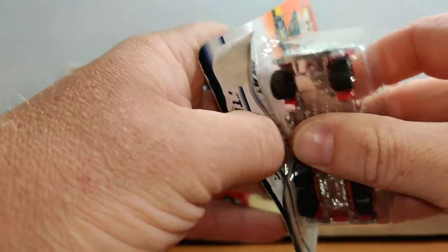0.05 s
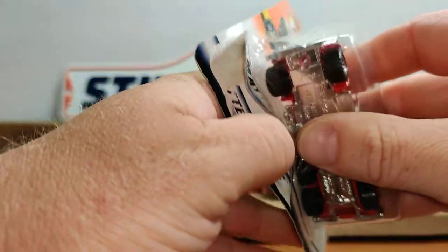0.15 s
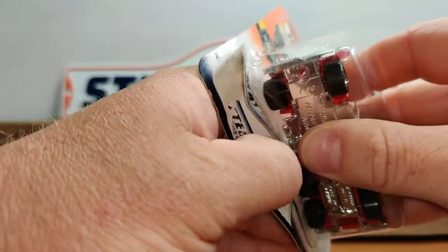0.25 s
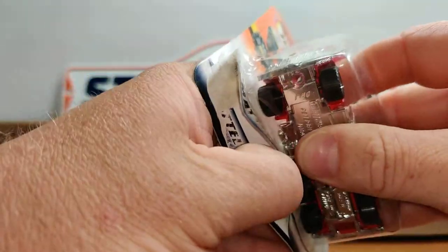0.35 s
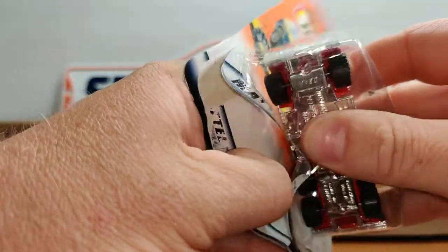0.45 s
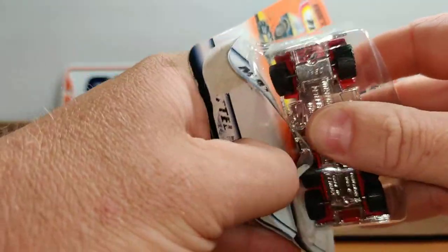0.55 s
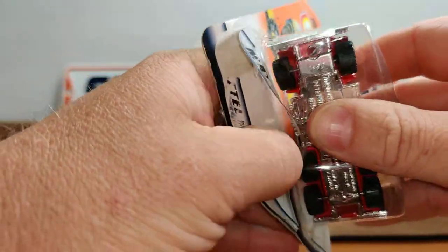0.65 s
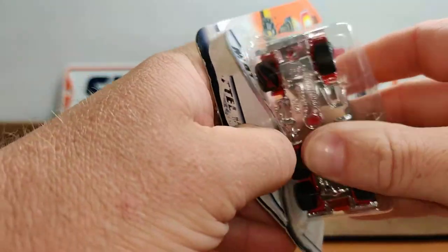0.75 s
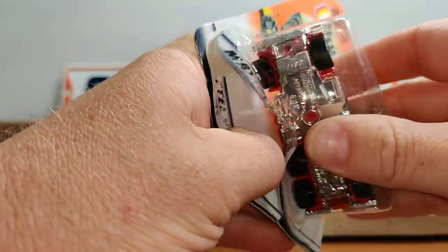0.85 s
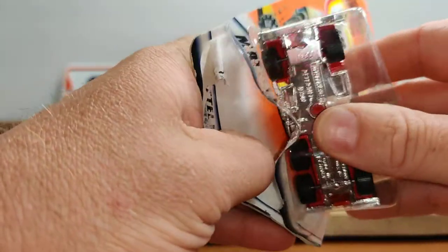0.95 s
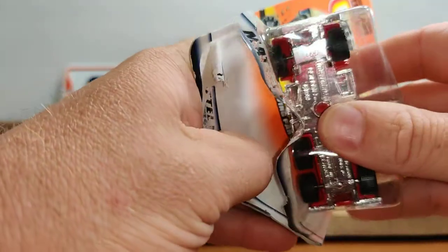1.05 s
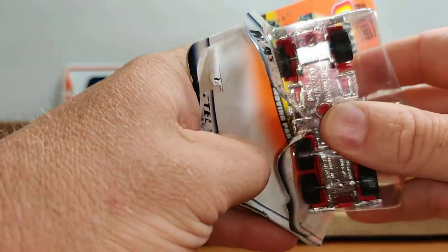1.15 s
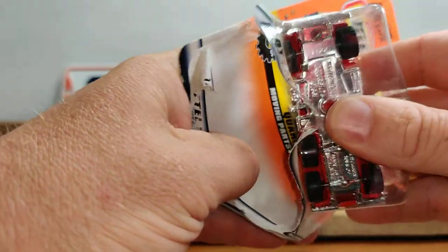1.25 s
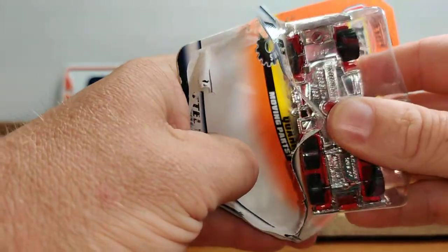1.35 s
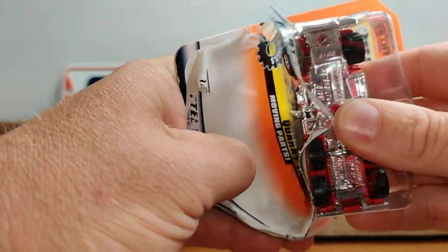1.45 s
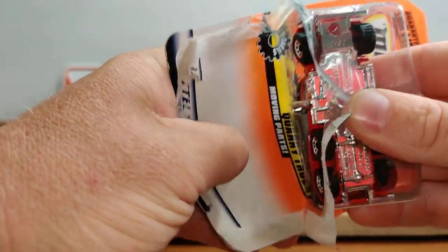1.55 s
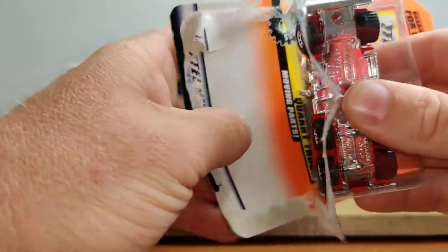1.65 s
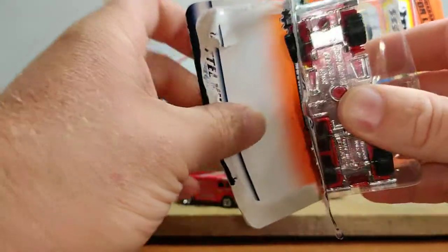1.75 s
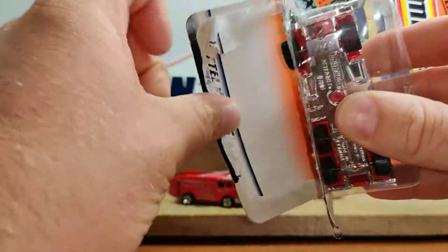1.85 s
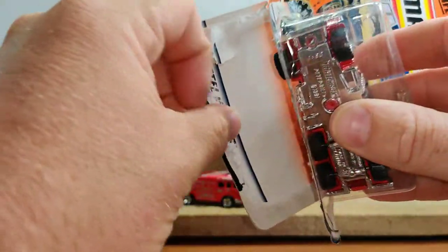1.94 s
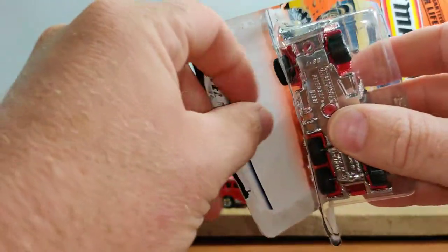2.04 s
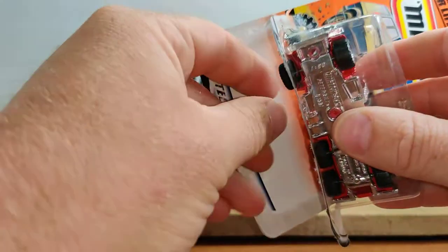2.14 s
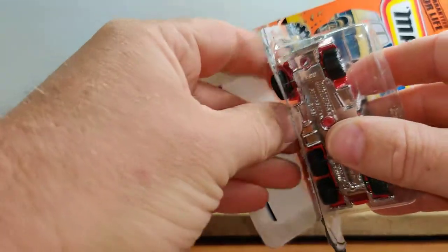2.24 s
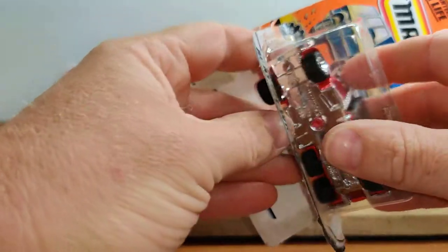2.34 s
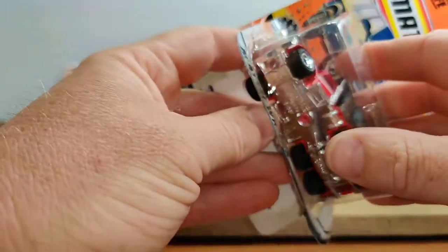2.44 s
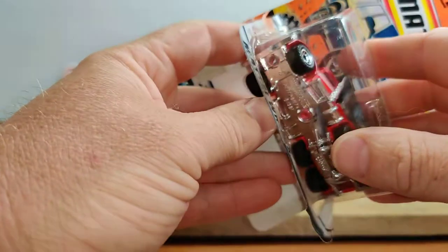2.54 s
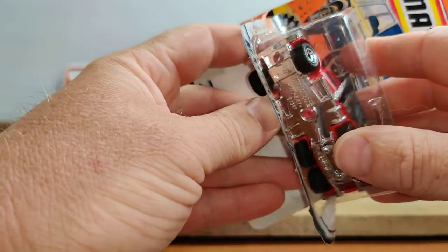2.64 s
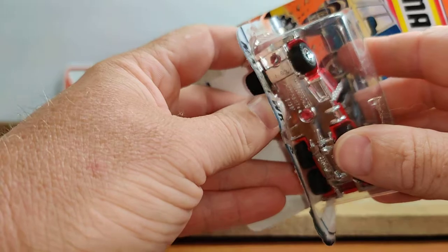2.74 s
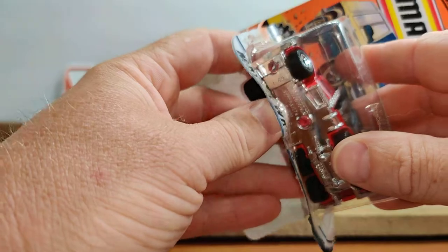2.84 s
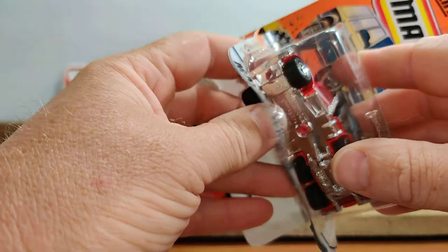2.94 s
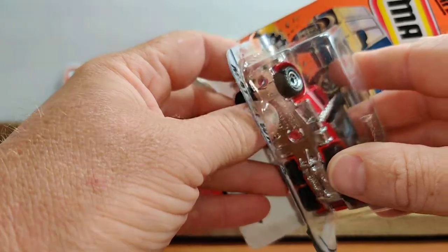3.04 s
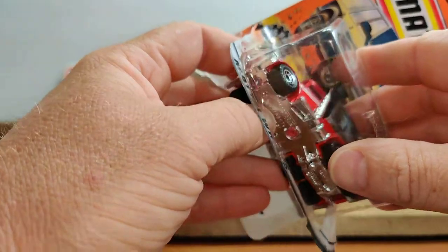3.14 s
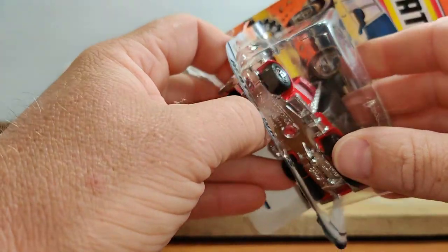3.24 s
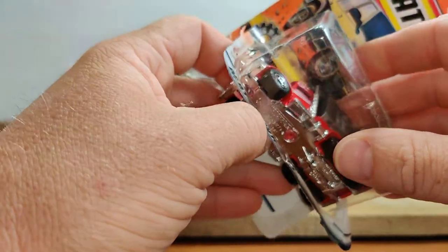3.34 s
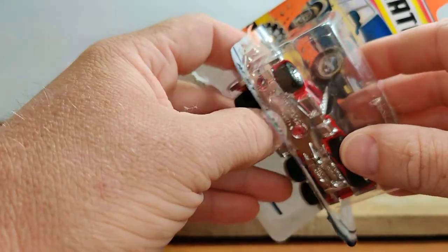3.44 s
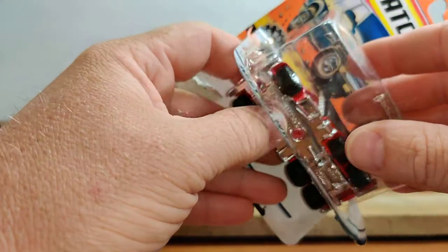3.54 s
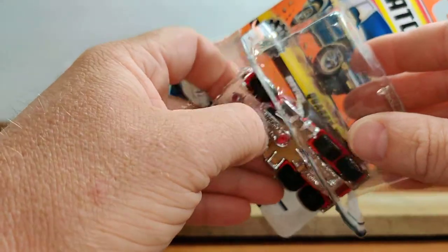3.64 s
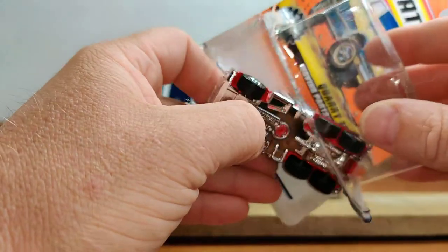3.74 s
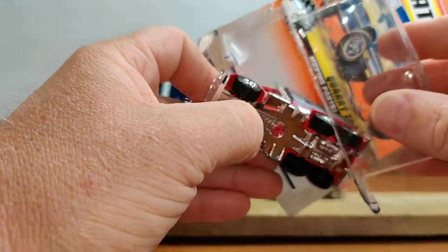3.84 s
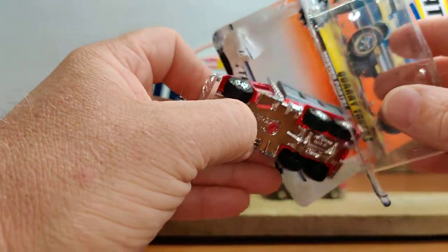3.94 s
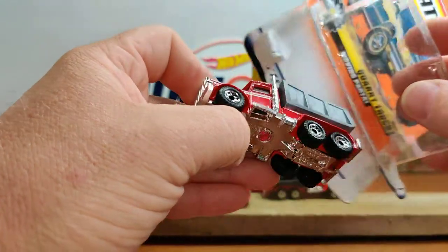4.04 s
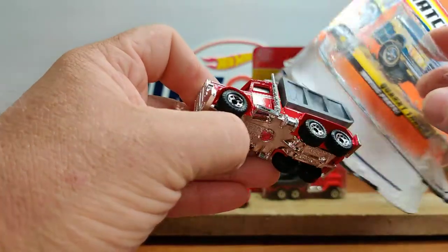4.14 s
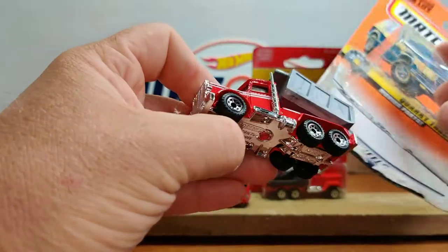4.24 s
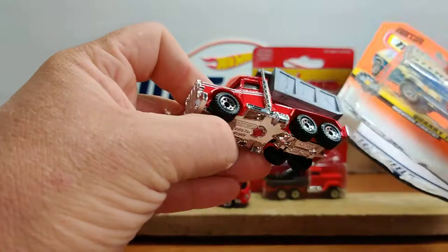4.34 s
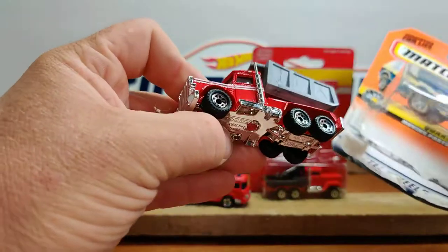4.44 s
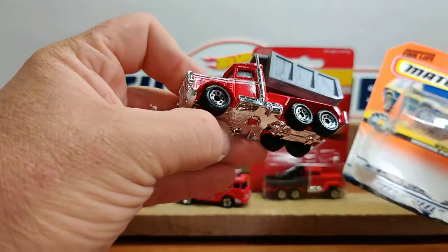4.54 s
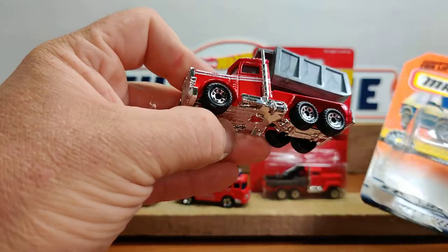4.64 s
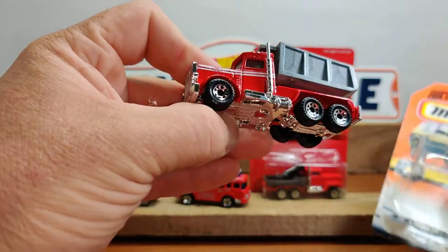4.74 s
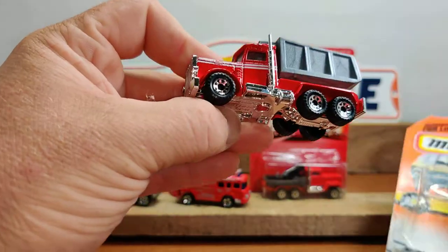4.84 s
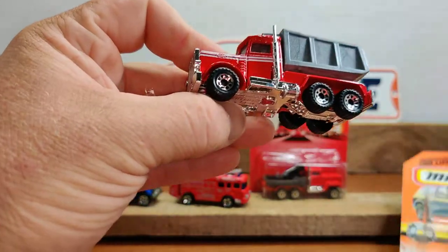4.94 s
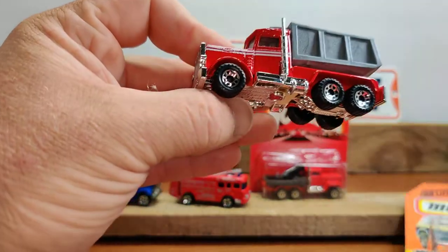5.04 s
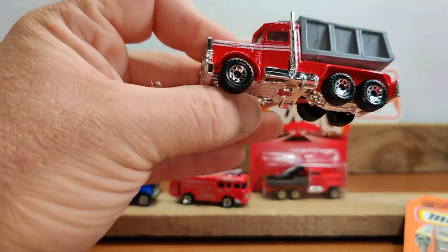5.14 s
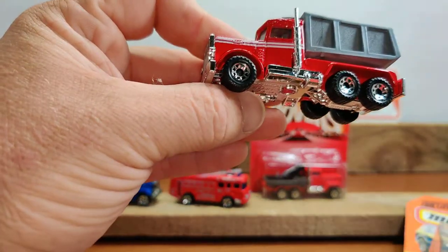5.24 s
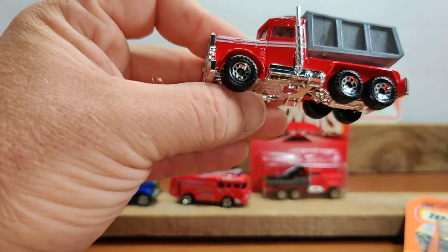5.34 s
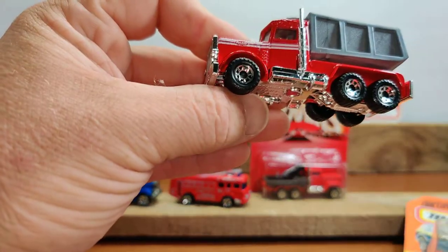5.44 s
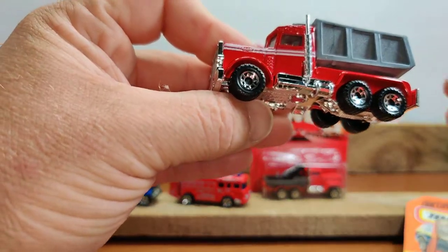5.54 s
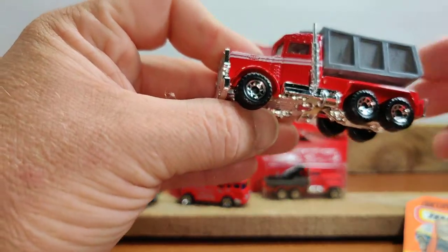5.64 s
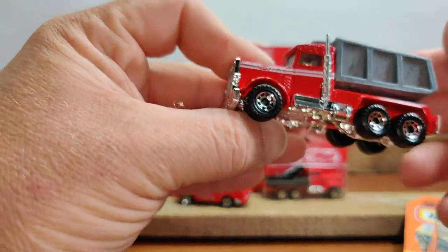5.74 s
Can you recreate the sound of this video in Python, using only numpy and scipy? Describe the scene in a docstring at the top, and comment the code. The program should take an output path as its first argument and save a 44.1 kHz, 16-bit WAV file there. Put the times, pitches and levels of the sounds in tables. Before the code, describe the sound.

Stiff plastic blister packaging snaps and crackles close up as it is peeled from card, then the empty pack drops on a table.

```python
"""Peeling a blister pack

Two hands peel a stiff plastic blister from its card close to a two-port microphone in a quiet room.
The shell buckles in sharp snaps (ringing modes) over a crackle of tearing glue and paper (many tiny
slips); a toy is pulled out, and the empty pack is dropped on the table to the right.
Hollow booms of the air pocket, hand rumble and thumps, and a faint hum with air noise lie around them."""
import sys
import numpy as np
from scipy import signal
from scipy.fft import rfft, irfft
from scipy.io import wavfile
from scipy.ndimage import uniform_filter1d

SR = 44100
rng = np.random.default_rng(int(sys.argv[2]) if len(sys.argv) > 2 else 0)


def boost_factor(decibels):
    """Convert a level in decibels to a linear amplitude factor."""
    exponent = np.asarray(decibels, float) / 20
    return 10 ** exponent


def int16_out(signal):
    """Quantize to a 16-bit WAV file."""
    q = np.round(np.clip(np.atleast_2d(signal).T, -1, 1) * 32767)
    wavfile.write(sys.argv[1], SR, q.astype(np.int16))


N = 255250  # length in samples

# Room tone, shape of its spectrum only: f/Hz, level/dB
AIR_SPECTRUM = [(15, -33), (25, -3), (64, 1), (92, -20.5), (161, -7), (405, -17.5), (887, -28), (4140, -45),
                (4870, -39), (6380, -48.5), (13600, -23.5), (16000, -45)]
AIR_DB = -64.5  # rms of the air noise before the microphone
# Room tone, how alike left and right are: f/Hz, likeness (0 to 1)
AIR_LIKENESS = [(300, 0.73), (1000, 0.39), (4000, .3), (12000, 0.18)]
# Steady hum before the microphone: f/Hz, level/dB (rms)
HUM_TONES = [(59, -76), (119, -69), (153, -67)]
# Thumps of the hands through table and stand, each starting 0.02 s before t: t/s, level/dB
HAND_THUMPS = [(0.515, -28), (0.682, -47), (1.3, -40), (1.572, -36.5), (1.69, -37.5), (3.06, -38),
               (3.251, -37.5), (4.025, -37)]

# Fingers resting and shifting on the pack between pulls: t/s, crackle level/dB
GRIP_LEVELS = [(0, -56.5), (.4, -61), (.85, -57), (1.4, -57.5), (1.9, -63), (2.2, -60.5), (2.45, -62.5),
               (2.9, -73), (3.15, -60), (3.36, -78.5), (3.9, -65), (4.4, -81), (5.2, -86.5), (5.5, -64.5),
               (5.79, -79)]
GRIP_BODY_DB, GRIP_FIZZ_DB = 3.5, 1.5  # relative to its crackle
# Separate pulls, rubs and slides: middle t/s, length t/s, crackle level/dB,
# card body level/dB, paper fizz level/dB (body and fizz relative to the crackle)
PACK_PULLS = [(0.106, 0.19, -44, -3, -2), (0.284, 0.13, -53, -4.5, 2), (0.487, 0.081, -41.5, -26, 1.5),
              (0.702, 0.18, -55, 6, -20.5), (0.95, 0.059, -33.5, 0.5, 1.5),
              (1.077, 0.63, -53.5, -18.5, -1.5), (1.29, 0.11, -35.5, -14, 1.5),
              (1.552, 0.19, -40, -26, 2.5), (1.713, 0.37, -48, -8.5, -7.5), (2.3, 0.082, -50.5, 0, -3.5),
              (2.602, 0.16, -49.5, -12, -3.5), (3.016, 0.054, -51.5, -2.5, -1.5),
              (3.478, .16, -57.5, -2.5, -5), (3.691, 0.21, -58.5, 8.5, -4), (4.04, 0.1, -53.5, 4.5, -4),
              (4.197, 0.12, -58.5, -4, -4), (4.301, 0.064, -66.5, 6, 0), (4.504, 0.057, -71.5, 1, -5),
              (5.162, 0.22, -78, 7, 6), (5.309, .05, -68, 3, 2.5), (5.428, 0.16, -82, 27, -15.5)]
EDGE_DB, EDGE_SHARPNESS = -8, 13  # a pull holds, then falls by this much at its ends

# Modes of shell and card at rest: f/Hz, level/dB, time to fall 60 dB t/s (before damping in ring())
SHELL_MODES = [(330, -20.5, 0.031), (398.2, -2.5, 0.049), (686.4, 7.5, 0.01), (850, -9.5, 0.01),
               (1107, -1.5, 0.02), (1500, -1.5, 0.036), (1646, 5.5, 0.0042), (1969, -2, 0.01),
               (2615, 3.5, 0.0093), (2969, 2.5, 0.0058), (3639, 2.5, 0.0096), (3323, -1, 0.015),
               (5060, -4, 0.012)]
LOW_HZ, MIDDLE_HZ = 900, 2250  # upper limits of the low and middle modes
FACET_DB = 13.5  # strength of the buckling facet among the modes
FACET_T60_S = 0.0072  # its 60 dB fall at 1 kHz, before damping; shorter above
# Buckling snaps and knocks: t/s, level/dB, buckling facet f/Hz, low modes level/dB,
# middle modes level/dB, crack level/dB (these three relative to the snap, before the lift in ring())
SNAP_EVENTS = [(0.045, -8, 740, -17.5, -21.5, -25.5), (0.064, -19.5, 760, -11, -19, -23.5),
               (0.078, -31, 2600, -12, -14.5, -24.5), (0.092, -30, 770, -4, -6.5, -34.5),
               (0.114, -34.5, 684, 2.5, -1, -18.5), (0.132, -21.5, 720, -12, -14, -16.5),
               (0.152, -5, 1750, -20.5, -16, -31.5), (0.279, -18, 2800, -35, -39.5, -17),
               (0.295, -28.5, 4770, -34.5, -31, -5.5), (0.309, 1, 3210, -50, -43.5, -18.5),
               (0.453, -31.5, 3050, -11.5, -25.5, -24), (0.473, 0.5, 705, -18.5, -24, -21),
               (0.565, -3, 2750, -29.5, -24.5, -16), (0.65, -46.5, 455, 10.5, -12, -12.5),
               (0.738, -26.5, 675, -12.5, -18.5, -18), (0.781, -23, 1410, -5, -0.5, -40),
               (0.811, -1, 1660, -21.5, -13.5, -23.5), (0.915, -12, 2850, -17, -25, -13.5),
               (0.945, -15, 600, -5.5, -2.5, -25.5), (0.962, -32.5, 684, -37, -11, -12),
               (0.976, -11, 2030, -29.5, -5, -16), (0.987, -0.5, 744, -16.5, -23.5, -16.5),
               (1.255, -33, 617, 4.5, -42, -17), (1.284, -15, 690, -14, -20.5, -12.5),
               (1.474, -4, 676, -15.5, -24, -21), (1.558, -3, 3100, -26.5, -15.5, -20.5),
               (1.599, -2, 1580, -41.5, -13, -18.5), (1.685, -13.5, 660, -9, -19, -22.5),
               (1.703, -4, 3460, -40, -12.5, -21.5), (1.896, -2, 1370, -33, -8.5, -41.5),
               (2.028, -14.5, 1180, -13, -2, -41), (2.086, -9, 1428, -41.5, -2, -14),
               (2.272, -26.5, 1310, -21, -12, -31), (2.307, -26, 1430, -16, -15, -17.5),
               (2.348, -1.5, 2870, -26, -21.5, -50.5), (2.46, 0, 2670, -30, -18.5, -12.5),
               (2.623, -31, 1150, -9, -9, -15.5), (2.655, -33, 664, -4.5, -9, -8.5),
               (2.691, -17, 2210, -21, -15, -15), (2.702, -31, 442, -2, -5, -26),
               (2.74, -17, 3470, -21, -26.5, -11.5), (2.752, -18.5, 2980, -36.5, -7, -29),
               (2.839, -50.5, 468, 9, 5.5, -42.5), (3.019, 3.5, 3240, -39, -28.5, -23.5),
               (3.056, -13, 2820, -22.5, -17, -3), (3.077, -20.5, 460, -8, -5, -31),
               (3.244, -37.5, 590, 3, 1.5, -18.5), (3.409, -17.5, 3470, -38, -34, -61),
               (3.467, -31, 5270, -29, -20, -8.5), (3.533, -43, 1150, -29, -4, 2.5),
               (3.651, -41.5, 736, 1, 2.5, -19.5), (3.704, -28.5, 5770, -26, -43.5, 0.5),
               (3.795, -18.5, 557, -5.5, -13.5, -49), (3.888, -40, 640, -16.5, -15, -23.5),
               (3.897, -17, 3980, -30.5, -30.5, -32), (4.006, -23.5, 3800, -25, -44, -27.5),
               (4.015, -21.5, 660, -12.5, -23.5, -18), (4.029, -30.5, 436, -9.5, -34, -18),
               (4.058, -17.5, 3370, -34, -36, -27.5), (4.29, -53, 730, 6, -27, -6),
               (4.339, -69.5, 1086, 14, 19.5, -9.5), (4.387, -45, 3506, -22, -22, -21),
               (4.86, -22.5, 3850, -33.5, -28.5, -58.5), (4.877, -37.5, 3750, -22, -15, -43),
               (5.133, -57, 1202, 0, 5, -30.5), (5.356, -38.5, 1090, 1.5, -1.5, -34.5),
               (5.734, -66, 656, 10, -16, -23)]
# Where the hands are: t/s, left-right level/dB, left delay in samples
HAND_PATH = [(0, 2, 1), (2, -0.5, 2), (4.001, 2.5, 3), (4.998, 1, 3.5)]

# Squeezes and blows that make the air pocket of the blister boom: t/s, level/dB
POCKET_BOOMS = [(0.048, -30.5), (0.474, -21), (0.988, -35.5), (1.478, -37), (2.031, -24.5), (2.355, -34),
                (2.752, -24.5), (3.024, -27.5), (3.078, -30), ]
POCKET_HZ, POCKET_T60_S, POCKET_RISE_S = 398, 0.098, 0.003

# The pack meets the table: t/s, level/dB
TABLE_HITS = [(5.4563, -0.5), (5.46, -9)]
# Modes of pack and table: f/Hz, level/dB, time to fall 60 dB t/s
LANDING_MODES = [(268, -5.5, 0.015), (394, -4.5, 0.041), (640, -5, 0.018), (1177, -8, 0.05),
                 (1454, -5, 0.032), (2627, -7.5, 0.018), (4670, -2.5, 0.0065)]

# Echoes from table top and backdrop, before a small random delay: t/s, level/dB
NEAR_ECHOES = [(.0023, -9.5), (.0051, -17)]
# Fading of the room: f/Hz, time to fall 60 dB t/s
ROOM_FADE = [(250, 0.67), (700, 0.52), (1200, 0.51), (2000, 0.38), (5000, 0.39), (12000, 0.4)]

# Response of the microphone ports: f/Hz, level/dB
PORT_RESPONSE = [(60, -0.5), (200, -4.5), (3000, 3.5), (4200, -5.5), (4830, 10.5), (5500, 3.5), (6000, 0),
                 (9000, -5.5), (16300, -12), (17100, -29)]
# Difference between the ports: f/Hz, left-right level/dB
PORT_TILT = [(100, -0.5), (700, 1), (2380, -2), (4400, 6.5), (8100, -2.5), (15000, 6)]
# How far the left port is ahead: f/Hz, phase in radians
PORT_LEAD = [(400, 0.16), (1000, 1), (2500, 0.033), (6000, 0.076)]


def evened(x):
    """Scales to rms 1."""
    return x / np.sqrt(np.mean(x ** 2) + 1e-20)


def read(points, hz):
    """Reads a curve on a log-frequency axis."""
    f, value = np.transpose(points)
    return np.interp(np.log(hz + 1), np.log(f + 1), value)


def band(x, low_hz, high_hz):
    """Causal band-pass."""
    edges_hz = [low_hz, min(high_hz, SR / 2.2)]
    return signal.sosfilt(signal.butter(2, edges_hz, "bandpass", fs=SR, output="sos"), x)


def placed(sound, pan_db, lag):
    """Places a sound by level difference and by the delay of the left port, in samples."""
    size = sound.shape[-1] + 64
    cycles = np.fft.rfftfreq(size)  # per sample
    side = np.array([[.5], [-.5]])
    delay = 16 + side * lag  # 16 samples leave room for the earlier port
    turned = np.exp(-2j * np.pi * cycles * delay)
    return irfft(rfft(sound, size) * boost_factor(side * pan_db) * turned, size)


def room_tone():
    """Faint steady air noise, partly alike in both ports, with a hum of wavering phase."""
    hz = np.fft.rfftfreq(2048, 1 / SR)
    a, b, c, d = rng.standard_normal((N // 512 + 5, 1025, 4)).T
    same = np.clip(read(AIR_LIKENESS, hz), -1, 1)[:, None]
    left = a + 1j * b
    right = same * left + np.sqrt(1 - same ** 2) * (c + 1j * d)
    spectra = np.array([left, right]) * boost_factor(read(AIR_SPECTRUM, hz))[:, None]
    noise = signal.istft(spectra, nperseg=2048, noverlap=1536)[1][:, :N]
    air = boost_factor(AIR_DB) * evened(noise)

    t = np.arange(N) / SR
    drift = rng.standard_normal((len(HUM_TONES), N))
    drift = evened(uniform_filter1d(uniform_filter1d(drift, 4000), 4000))
    hum = sum(np.sqrt(2) * boost_factor(db) * np.sin(2 * np.pi * f * t + 4.5 * wander)
              for (f, db), wander in zip(HUM_TONES, drift))
    return air + hum


def contact():
    """Levels in dB of crackle, card body and fizz: the grip plus every pull, added as power."""
    t = np.arange(0, N + 64, 64) / SR
    grip_db = np.interp(t, *np.transpose(GRIP_LEVELS))
    power = boost_factor(2 * (grip_db + np.array([[0], [GRIP_BODY_DB], [GRIP_FIZZ_DB]])))
    for s, length, db, body_db, fizz_db in PACK_PULLS:
        pull_db = db + EDGE_DB * abs(2 * (t - s) / length) ** EDGE_SHARPNESS
        power = power + boost_factor(2 * (pull_db + np.array([[0], [body_db], [fizz_db]])))
    return [np.interp(np.arange(N) / SR, t, level) for level in 10 * np.log10(power)]


def handling(rumble_db=-50, follow=0.36):
    """A rumble that grows with the pull on the card, and soft thumps of two low tones each."""
    body_db = contact()[1]
    pull_db = body_db - body_db.max()
    rumble = band(rng.standard_normal((2, N)), 27, 70)
    rumble = rumble + 0.85 * band(rng.standard_normal((2, N)), 160, 310)
    shared = rumble + 0.89 * rumble[::-1]  # nearly alike in both ports
    out = boost_factor(rumble_db + follow * pull_db) * evened(shared)

    t = np.arange(4000) / SR
    swell = (t / 0.028 * np.exp(1 - t / 0.016)) ** 2
    for (s, db), chance in zip(HAND_THUMPS, rng.random((len(HAND_THUMPS), 4))):
        deep_hz, upper_hz = 40 + 45 * chance[2], 130 + 70 * chance[3]
        deep = np.sin(2 * np.pi * (deep_hz * t + chance[0]))
        upper = np.sin(2 * np.pi * (upper_hz * t + chance[1]))
        part = out[:, round((s - .02) * SR):][:, :len(t)]
        part += boost_factor(db) * (deep + 1.25 * upper) * swell
    return out * boost_factor([[-1.5], [1.5]])


def ring(chance, facet_hz, low_db, middle_db, crack_db, high_db=-12.5, damping=0.71):
    """The buckle runs over the shell in about two milliseconds and starts each mode in turn.
    The facet that buckles adds its own note. Modes shift as the shell is bent, sag as it relaxes,
    and each radiates a little differently to the two ports; a noisy crack lies on top."""
    facet = (facet_hz, FACET_DB, FACET_T60_S / np.sqrt(facet_hz / 1000))
    hz, db, t60 = np.transpose(SHELL_MODES + [facet])
    varied = chance[:5 * len(hz)].reshape(5, -1) * (hz != facet_hz)  # the facet itself does not vary
    bent, loud, late, lobe_db, lobe_turn = varied
    side, t = np.array([.5, -.5])[:, None, None], np.arange(2000) / SR

    age = np.maximum(t[:, None] - 0.0006557 * abs(late), 0)  # seconds since each mode was started
    relaxing = age + .08 * .003 * (1 - np.exp(-age / .003))  # starts 8 % high, then sags
    phase = 2 * np.pi * hz * (1 + 0.056 * bent) * relaxing
    swing = np.sin(phase + side * lobe_turn * np.sqrt(hz / 2500))
    swing = swing * np.minimum(age * hz, 1)  # each mode swells over one cycle
    mode_db = db + 2 * loud + 0.25 * side * lobe_db
    modes = boost_factor(mode_db - 60 * age * damping / t60) * swing

    rattle = 1 + 0.66 * evened(uniform_filter1d(chance[-len(t):], 24))  # the loose shell rattles
    chatter = rattle * (1 + 2.3 * boost_factor(-60 * t / 0.0024))  # the buckle hits hardest at first
    low, high = hz < LOW_HZ, hz >= MIDDLE_HZ
    out = np.zeros((2, len(t)))
    for members, level_db in ((low, low_db), (~low & ~high, middle_db), (high, high_db)):
        part = band(modes[..., members].sum(2) * chatter, 160, 16000)  # the ringing stays above about 160 Hz
        out += boost_factor(level_db + 8.0) * part / abs(part).max()

    noise = chance[100:].reshape(2, -1)
    noise = noise[0] + 1.4 * noise * [[0], [1]]  # the right port adds noise of its own
    crack = band(noise, 3400, 18000) * (1 - np.exp(-t / 0.00016)) * boost_factor(-60 * t / 0.0065)
    return out + boost_factor(crack_db + 18.5) * crack / abs(crack).max()


def peel(slips_per_s=400, spread_db=5.0):
    """Clumped tiny slips of glue and fibres ring shell and card; the finest fibres fizz."""
    crackle_db, body_db, fizz_db = contact()
    # a hard pull tears in grains, a light touch only rubs
    tearing = np.clip((crackle_db + 86.0) / 40, .35, .95)
    slow = evened(uniform_filter1d(uniform_filter1d(rng.standard_normal(N), 220), 220))
    clumps = boost_factor(3.8 * tearing * slow)
    slips = boost_factor(spread_db * np.minimum(rng.exponential(1, N), 3))
    slips = slips * (rng.random(N) < slips_per_s / SR)
    rubbing = np.sqrt(1 - tearing ** 2) * rng.standard_normal(N)
    drive = clumps * (tearing * evened(slips) + rubbing)

    spot = rng.integers(0, 16, N)  # each moment falls on one of 16 spots of the pack
    layers = np.zeros((3, 2, N))  # body, crackle, fizz
    off = -np.inf
    for k, row in enumerate(rng.standard_normal((16, 4100))):
        facet_hz = 2000 * np.exp(0.49 * row[92])
        body = ring(row, facet_hz, 0, off, off, off)
        crackle = ring(row, facet_hz, off, -17.5, off)
        fibres = ring(row, facet_hz, off, off, 0, off)
        for layer, shape in zip(layers, (body, crackle, fibres)):
            spread = placed(shape, 0.2 + 0.7 * row[90], -2.5 + 7.2 * row[91])
            layer += signal.oaconvolve((drive * (spot == k))[None], spread, axes=1)[:, :N]

    rub = band(rng.standard_normal((2, N)), 5200, 16000) * clumps  # smooth sliding of paper
    fizz = evened(layers[2]) + 0.85 * evened(rub)
    parts = (body_db, layers[0]), (crackle_db, layers[1]), (fizz_db, fizz)
    return sum(boost_factor(db) * evened(x) for db, x in parts)


def snaps():
    """Every snap rings the shell in its own colour; the direction follows the hands with some scatter."""
    out = np.zeros((2, N + 4000))
    path_s, pan_db, lag = np.transpose(HAND_PATH)
    rows = rng.standard_normal((len(SNAP_EVENTS), 4100))
    for (s, level_db, *colour), row in zip(SNAP_EVENTS, rows):
        snap_pan_db = np.interp(s, path_s, pan_db) + 2.3 * row[90]
        sound = placed(ring(row, *colour), snap_pan_db, np.interp(s, path_s, lag))
        out[:, round(s * SR):][:, :sound.shape[1]] += boost_factor(level_db) * sound
    return out[:, :N]


def pocket():
    """The air pocket booms: a short hollow note, slightly higher or lower as the shell is bent."""
    t, out = np.arange(4000) / SR, np.zeros(N + 4000)
    for (s, db), (bent,) in zip(POCKET_BOOMS, rng.standard_normal((len(POCKET_BOOMS), 1))):
        note = np.sin(2 * np.pi * POCKET_HZ * (1 + 0.0071 * bent) * t)
        note = note * (1 - np.exp(-t / POCKET_RISE_S))
        out[round(s * SR):][:len(t)] += boost_factor(db - 60 * t / POCKET_T60_S) * note
    return out[:N]


def drop():
    """The pack lands edge first, then flat, and rings card and table under a wide slap."""
    t, out = np.arange(4000) / SR, np.zeros((2, N + 5000))
    for (s, db), chance in zip(TABLE_HITS, rng.standard_normal((len(TABLE_HITS), len(t)))):
        ringing = np.zeros(len(t))
        for (hz, mode_db, t60), bent in zip(LANDING_MODES, chance):
            mode = np.sin(2 * np.pi * hz * (1 + 0.0082 * bent) * t) * np.minimum(t * hz, 1)
            ringing += boost_factor(mode_db - 60 * t / t60) * mode
        rattle = 1 + 0.53 * evened(uniform_filter1d(chance[::-1], 40))  # the pack rattles
        ringing = band(ringing * rattle, 190, 11000)
        slap = band(chance, 210, 7400) * boost_factor(-60 * t / 0.003)
        sound = ringing / abs(ringing).max() + boost_factor(1.5) * slap / abs(slap).max()
        out[:, round(s * SR):][:, :len(t) + 64] += boost_factor(db) * placed(sound, -8.0, 11.0)
    return out[:, :N]


def room(x, far, tail_db=-16.0, near_db=12.):
    """Near echoes, then three sparse tails fed in turn: a quick scatter off the desk and a slower room."""
    early, out = np.zeros((2, 400)), np.zeros((2, N))
    for s, db in NEAR_ECHOES:
        at = round(s * SR) + rng.integers(0, 12, 2)
        early[[0, 1], at] = boost_factor(db) * rng.choice([-1., 1.])

    size, fed = SR // 2, x + far
    fed = (fed + .5 * fed[::-1]) / 1.67  # the ports blend
    for k in range(3):
        taps = np.zeros((2, size))
        at = np.arange(100, size - 20, 20) + rng.integers(0, 20, (2, (size - 101) // 20))
        np.put_along_axis(taps, at, rng.choice([-1., 1.], at.shape), 1)
        taps += .3 * taps[::-1]
        hz, t, z = signal.stft(taps, SR, nperseg=256)
        fade = boost_factor(-60 * t / read(ROOM_FADE, hz)[:, None])
        tail = signal.istft(z * fade, SR, nperseg=256)[1]
        scatter = boost_factor(near_db - 60 * np.arange(tail.shape[1]) / SR / 0.074)
        tail = tail / np.linalg.norm(tail[0]) * (1 + scatter)
        turn = np.sqrt(2 / 3) * np.cos(2 * np.pi * (np.arange(N) / SR * 3 + k / 3))
        out += signal.fftconvolve(fed * turn, tail, axes=1)[:, :N]
    return x + signal.fftconvolve(x, early, axes=1)[:, :N] + boost_factor(tail_db) * out


def scene():
    """Pack in the room, over handling and room tone; the drop is farther off, so more of it is room."""
    landing = drop()
    pack = snaps() + pocket() + landing + boost_factor(0.5) * peel()
    return room(pack, boost_factor(-5.5) * landing) + handling() + room_tone()


def roll_off(x):
    """The treble ends steeply here."""
    return signal.sosfilt(signal.butter(12, 17060, fs=SR, output="sos"), x)


def record(dry, ceiling=0.89):
    """The microphone ports ring near 5 kHz and differ in level and phase; peaks round off."""
    hz = np.fft.fftfreq(4096, 1 / SR)
    side = np.array([[.5], [-.5]])
    log_gain = np.log(boost_factor(read(PORT_RESPONSE, abs(hz)) + side * read(PORT_TILT, abs(hz))))
    lead = 1j * side * np.sign(hz) * read(PORT_LEAD, abs(hz))
    minimum_phase = -1j * signal.hilbert(log_gain).imag  # the ports ring after a sound, not before
    ports = np.fft.ifft(np.exp(log_gain + minimum_phase + lead)).real
    ports = np.roll(ports, 256, axis=1)[:, :1500]  # the shift is undone in the next line
    heard = signal.oaconvolve(dry, ports, axes=1)[:, 256:N + 256]
    mix = ceiling * np.tanh(heard / ceiling)
    return roll_off(mix)


dry = scene()
out = record(dry)
int16_out(out)
```